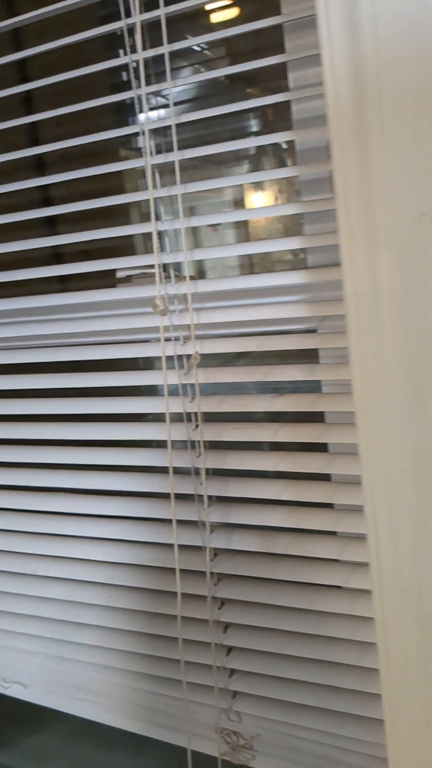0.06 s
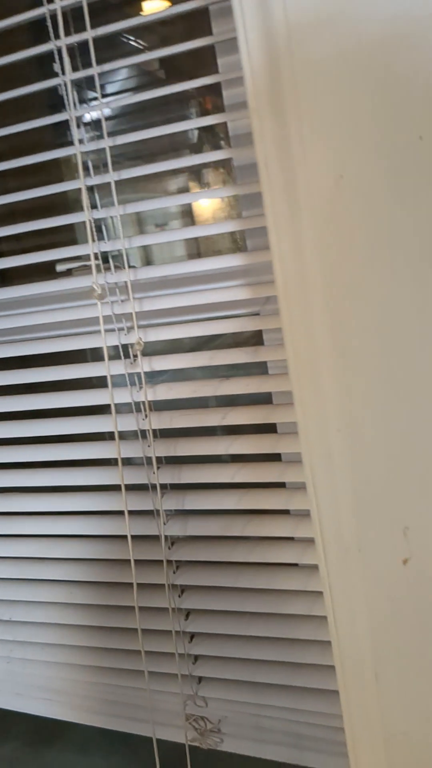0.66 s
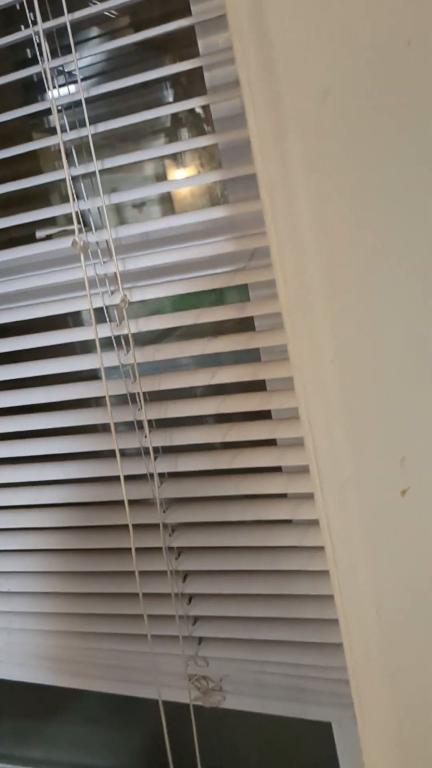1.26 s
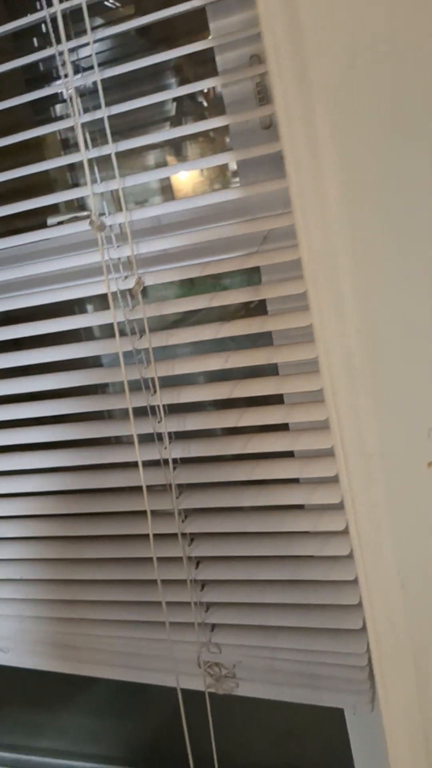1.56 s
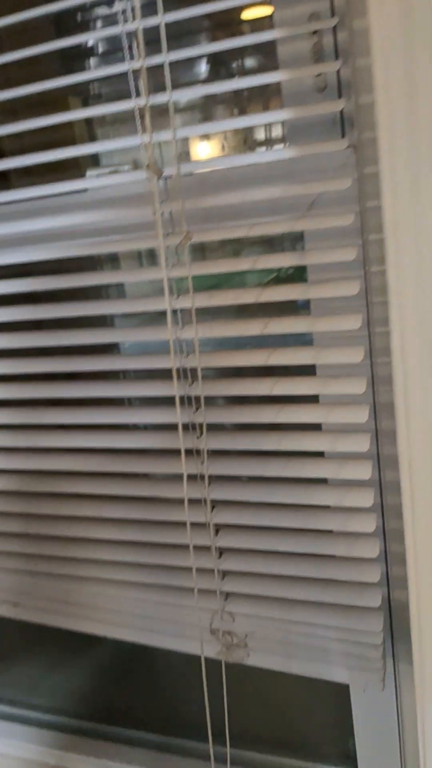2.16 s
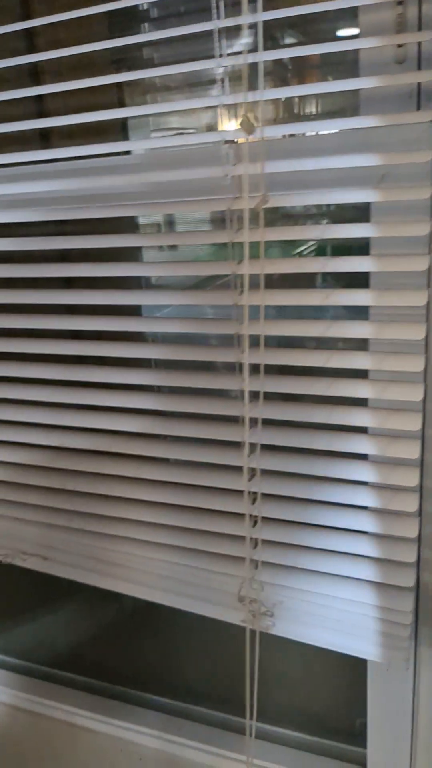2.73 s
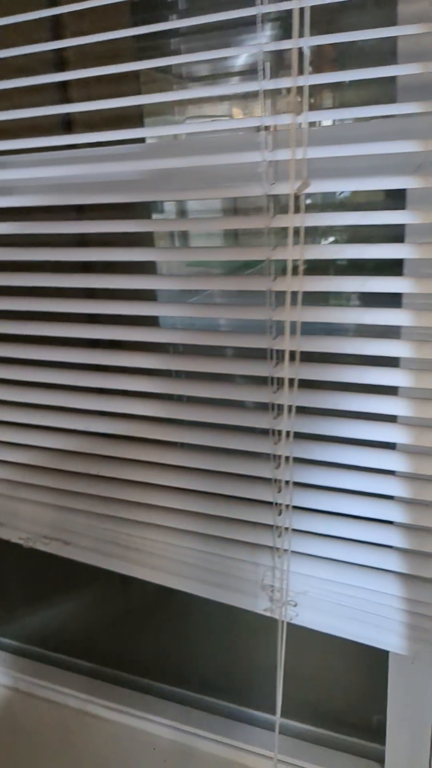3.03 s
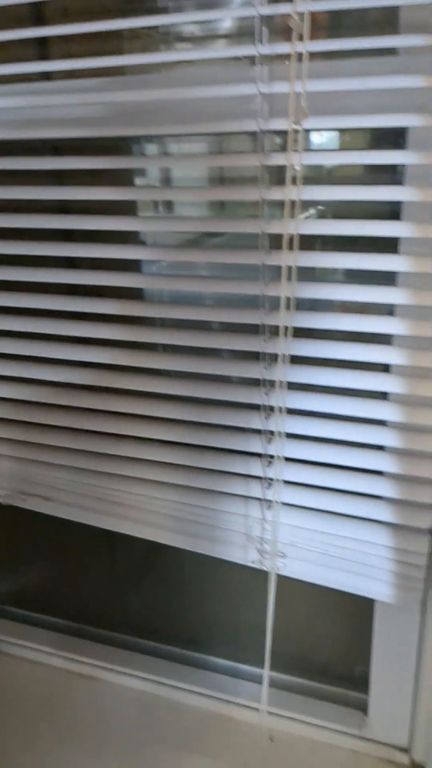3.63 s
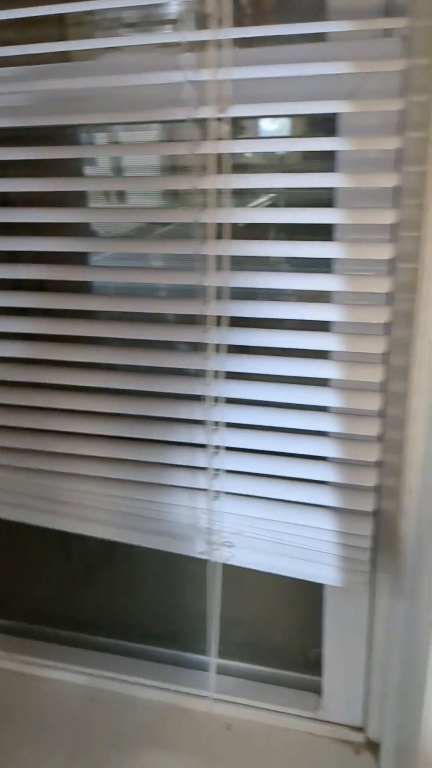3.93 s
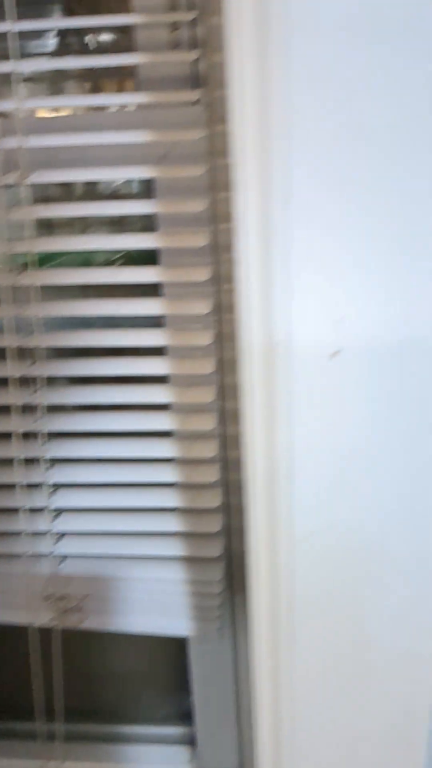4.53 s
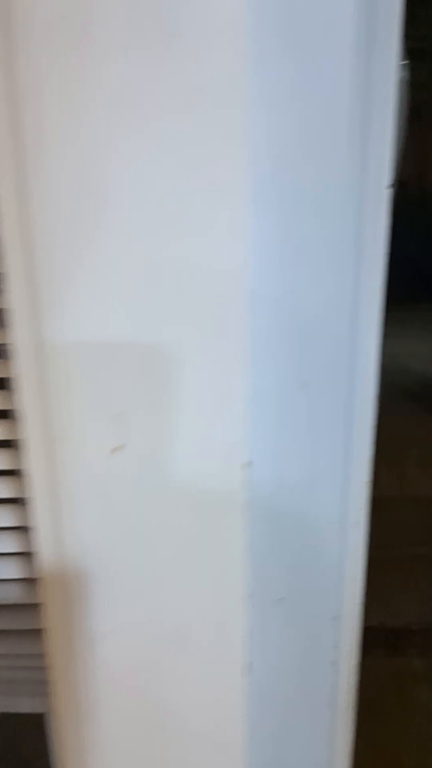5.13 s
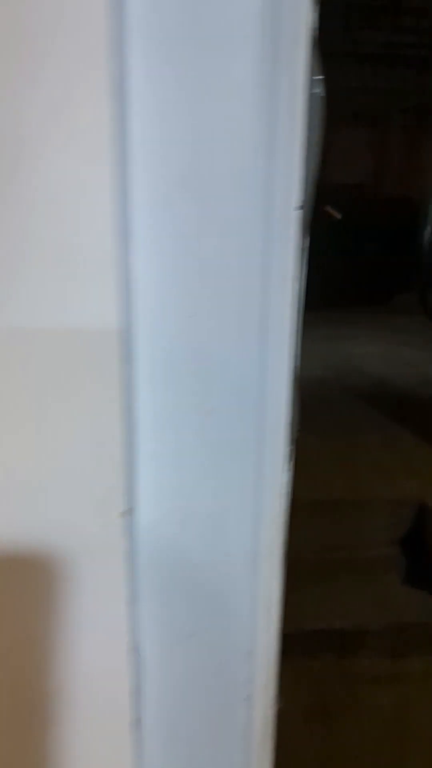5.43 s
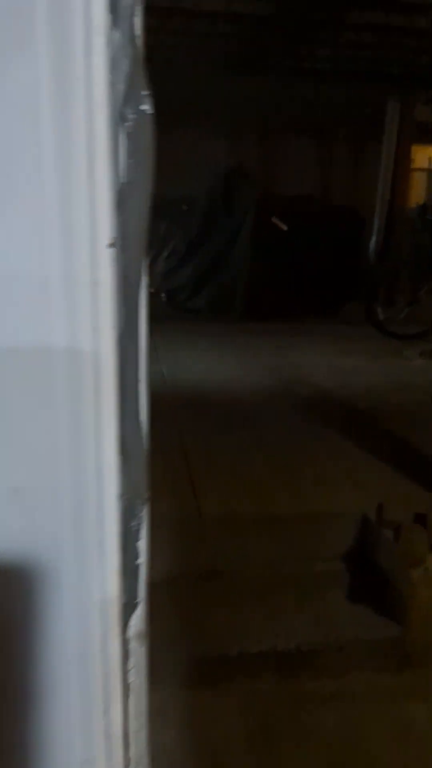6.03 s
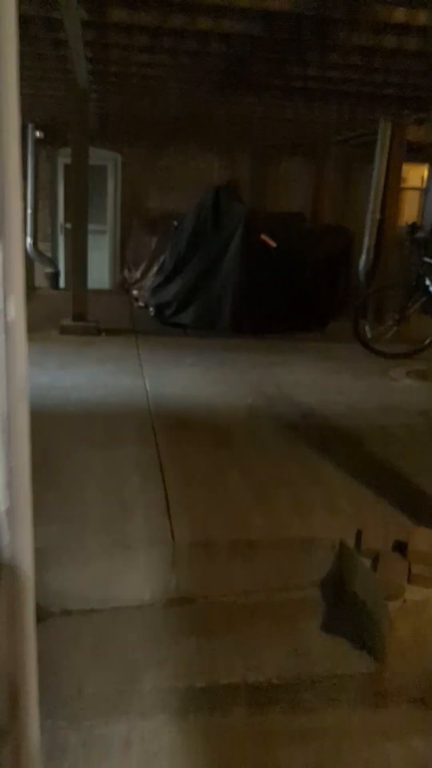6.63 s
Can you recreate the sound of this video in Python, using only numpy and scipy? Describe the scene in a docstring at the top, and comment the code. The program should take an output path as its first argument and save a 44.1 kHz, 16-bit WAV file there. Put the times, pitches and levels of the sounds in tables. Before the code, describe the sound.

A latch clicks, then a glass door jerks open with a boom, rattling blinds and a short squeal, followed by a sharp knock.

```python
"""Opening a patio door with blinds

In a hard, echoing room the handle and latch click. A glass door rubs out of its seal and jerks free:
the pane booms, the slats of the blinds slap the glass and a metal part squeals. A sharp knock follows,
then small ticks and a scrape along the rail as the door swings aside, all over a low rumble."""
import sys
import numpy as np
from scipy import signal
from scipy.fft import rfft, irfft, next_fast_len
from scipy.io import wavfile
from scipy.ndimage import uniform_filter1d, minimum_filter1d

SR = 44100
rng = np.random.default_rng(int(sys.argv[2]) if len(sys.argv) > 2 else 0)


def unload_audio(sound):
    """Save the sound as a 16-bit wav file, at the path given as the first command line argument."""
    columns = np.transpose(np.atleast_2d(sound))
    # keep every value between -1 and 1, then stretch to whole-number steps
    steps = np.round(np.clip(columns, -1, 1) * 32767)
    wavfile.write(sys.argv[1], SR, steps.astype(np.int16))


N = 298998

# Ways the glass vibrates: pitch_hz, width_hz, level_db, ring_s (time to fade by 60 dB)
PANE_MODES = [(22, 12.7, 6, 2.24), (42, 21, 2.5, 1.52), (76.9, 14, 2.5, 1.75), (95, 10, -1, 1.55),
              (117.7, 11.8, -1.5, 1.24), (193, 110, -18, 1.1)]
# Pushes that bend the glass: start_s, level_db, rise_s
PUSHES = [(0.19, -46, 0.062), (1.04, -41, 0.041), (1.55, -39, 0.22), (1.88, -37, 0.088),
          (2.662, -40, 0.072), (2.88, -36, 0.16), (3.1, -20, 0.16), (3.325, -7.5, 0.085), (4.55, -39, 0.19),
          (5.15, -46.5, 0.43), (6.12, -47, 0.038)]
def pane_boom(hold_s=0.0058, rest_db=-57.5, spread_hz=210):
    """Each push sets the big pane booming; the deepest notes are the most alike left and right."""
    t, out = np.arange(N) / SR, np.zeros((2, N))
    coarse = t[::64]
    total = np.sqrt(sum(width * amp(db) ** 2 for _, width, db, _ in PANE_MODES))
    for hz, width, mode_db, ring_s in PANE_MODES:
        power = amp(rest_db) ** 2  # the glass is never quite still
        for s, db, rise in PUSHES:
            fall_db = 60 * np.maximum(coarse - s - rise - hold_s, 0) / ring_s
            power += (np.clip((coarse - s) / rise, 0, 1) * amp(db - fall_db)) ** 2
        boom = filtered(noise(), lambda f: resonances([(hz, width, 0)])(f) / (1 + (f / (3 * hz)) ** 2))
        mid, side = boom / np.sqrt(np.abs(uniform_filter1d(boom ** 2, size=SR // 5, axis=1)) + 1e-12)
        side = side * hz / np.hypot(hz, spread_hz)
        level = np.interp(t, coarse, np.sqrt(power))
        out += amp(mode_db) * np.sqrt(width) / total * level * np.array([mid + side, mid - side])
    return out


# Ways the door panel vibrates: pitch_hz, width_hz, level_db
DOOR_MODES = [(118, 18, 0.5), (255, 87, -10), (369.4, 68, 3), (460, 104, 2), (569, 89, 3.5), (656, 160, 0),
              (730, 59, -12.5), (976, 48, -4), (1006, 6.5, -14.5)]
# Tone of a hit's crack and of its bright edge: pitch_hz, level_db
CRACK_TONE = [(200, -32), (700, 0.5), (1200, 2.5), (1450, 0.5), (1800, 3.5), (2500, -2), (3050, -3),
              (3500, -12.5), (6000, -19.5)]
EDGE_TONE = [(2500, -41.5), (3500, -4.5), (4100, 6), (4900, 1), (5800, -3.5), (7000, -1), (12000, -37)]
def contact(body_db, edge_db, pan_db, chatter_s=0.19, snap_s=0.028, rise_s=0.001):
    """One hit snaps and chatters on one side and shakes the whole door panel."""
    t = np.arange(SR // 4) / SR
    fade = amp(-60 * t / chatter_s) + amp(2 - 60 * t / snap_s)
    blow = noise(len(t)) * fade * (1 - np.exp(-t / rise_s))

    def layer(response, db):
        sound = filtered(blow, response)
        return sound / np.std(sound[:, :SR // 60]) * amp(db)
    crack = layer(colour(CRACK_TONE), -9) + layer(colour(EDGE_TONE), edge_db - 8)
    return crack * panned(pan_db) + layer(resonances(DOOR_MODES), body_db - 8)


# Knocks of handle, latch and frame: start_s, level_db, body_boost_db, edge_boost_db, pan_db
KNOCKS = [(0.2621, -42, 5, -11, 5), (0.455, -54.5, 2, -3, 2), (1.0955, -43.5, 4.5, -7, 11),
          (1.6696, -28, 0.5, -16, 6), (1.8609, -39, 9, -11, -5.5), (1.902, -41.5, -2.5, -8.5, 2.5),
          (2.0504, -25, -9, -31, 0.5), (2.0663, -20, -1.5, -33, 5), (2.0931, -28.5, 7, -31, -9),
          (2.8747, -41, -3, -11, -8.5), (3.016, -25.5, -15.5, -9, 6.5), (3.1325, -14.5, 0, -6, 5.5),
          (3.1843, -18.5, 6, -5.5, 7.5), (3.2275, -13, -6, -14.5, 1.5), (3.2345, -11, -7.5, -8, 6.5),
          (3.2442, -13, -4, -10, 8.5), (3.2577, -15, 1.5, -6.5, -0.5), (3.3444, -26, 0, -15, 5.5),
          (3.385, -16.5, 2.5, -10, 1), (3.44, -17, -1, -19.5, 2.5), (3.502, -17.5, -3.5, -12.5, 5),
          (3.53, -20, 1, -14.5, 4), (4.055, -45, -4, -21.5, -2), (4.255, -49, 7, -16, -7.5),
          (4.31, -50.5, 2, -23, -0.5), (4.41, -45, 1, -17, -6), (4.535, -54, 6.5, 0, 0),
          (4.7173, -13, -5, -12.5, 2), (4.7399, -24, 6, -12, 4), (5.0968, -36.5, 6, -13, 1),
          (5.2673, -45, 15.5, -8, -9), (5.8631, -47, 6, -11, -11.5)]
def knocks(hits=3, gap_s=0.022, loss_db=16, duller_db=7):
    """Hard parts hit and bounce, each bounce weaker and duller than the last."""
    out = np.zeros((2, N))
    for s, db, body_db, edge_db, pan_db in KNOCKS:
        knock = np.zeros((2, SR * 5 // 4))
        for k in range(hits):
            add(knock, k * gap_s, amp(-k * loss_db) * contact(body_db + k * duller_db, edge_db, pan_db))
        add(out, s, amp(db) * in_room(knock, wet_db=-6.5))
    return out


# Tone of the dull rub, the scratch and the hiss: pitch_hz, level_db
RUB_TONE = [(60, -15.5), (150, -11), (270, -6.5), (400, -3.5), (520, 1), (720, -5), (920, -5.5),
            (1200, -13.5), (2500, -52.5)]
SCRATCH_TONE = [(600, -39.5), (1200, 0), (1800, 8), (2300, -1.5), (3000, 2), (3500, -18), (6000, -35)]
HISS_TONE = [(2500, -29), (3500, -3), (4200, 1), (5000, 0), (5800, 0), (7000, -6), (12000, -20.5)]
# Where the seal rasps: pitch_hz, width_hz, level_db
SEAL_MODES = [(1654, 44, -3.5), (2180, 67, -2), (2398, 120, 2.5), (2633, 81, 1.5), (2872, 100, -2),
              (3160, 84, -2.5), (3727, 62, -11.5), (5030, 100, -15.5), (5600, 110, -18)]
# Rubbing strokes: peak_s, hold_s, rub_db, scratch_db, hiss_db, rasp_db, swell_db_per_s, fade_db_per_s
# (scratch, hiss and rasp are relative to the rub)
STROKES = [(0.0, 0.007, -52.5, -5, -15.5, -9, 99, 12.8), (1.119, 0.014, -62, -1, 5.5, 5, 31.3, 33),
           (1.678, 0.04, -38.5, -12, -16.5, -11, 103.6, 21), (2.099, 0.016, -44, -2.5, -11.5, -9, 410, 37),
           (3.002, 0.27, -30.5, -9.5, -11, -11.5, 81.6, 77), (3.253, 0.012, -18, -7.5, -13, -16, 135, 37.5),
           (4.688, 0.015, -38.5, -7.5, -11, -7.5, 104.6, 29), (5.28, 0.22, -50.5, -3, -12, -5.5, 200, 450),
           (5.73, 0.032, -55.5, -6, -10, -8.5, 147.7, 440), (6.189, 0.26, -62, -2.5, -4.5, 3, 503, 48)]
SCRATCH_FADE, HISS_FADE = 1.245, 1.84  # brighter sounds fade this many times faster
def rubbing():
    """The seal drags on the frame and the slats chafe, in small uneven slips."""
    rub_db, scratch_db, hiss_db, rasp_db = np.transpose(STROKES)[2:6]
    grain = slips(per_s=220, life_s=0.0013, rough_db=-3.5)
    rub = pressure(rub_db) * unit(filtered(grain, colour(RUB_TONE)))
    scratch = pressure(rub_db + scratch_db, SCRATCH_FADE) * unit(filtered(grain, colour(SCRATCH_TONE)))
    hiss = pressure(rub_db + hiss_db, HISS_FADE) * unit(filtered(grain, colour(HISS_TONE)))
    coarse_grain = slips(per_s=61, life_s=0.0033, rough_db=7)
    rasp = pressure(rub_db + rasp_db, SCRATCH_FADE) * unit(filtered(coarse_grain, resonances(SEAL_MODES)))
    # the seal lets go on the left; the open door then passes on the right
    pan_db = over_time([(2.6, 0), (3.0, 5.5), (3.35, 4), (3.7, 4),
                        (4.6, -1.5), (5.2, -0.5), (5.8, -8), (6.2, 0)])
    edge = (scratch + hiss + rasp) * amp(np.array([pan_db, -pan_db]) / 2)
    return in_room(rub + edge, wet_db=-11.5)


def slips(per_s, life_s, rough_db):
    """Noise that flares at each of many small random slips."""
    kicks = (rng.random(N) < per_s / SR) * amp(rough_db * np.clip(rng.standard_normal(N), -2, 1))
    flare = signal.lfilter([1], [1, -np.exp(-1 / (life_s * SR))], kicks)
    return noise() * (1 + flare)


def pressure(levels_db, faster=1):
    """How hard the door rubs: each stroke swells, holds and fades."""
    t, power = np.arange(N) / SR, 0
    for db, (s, hold, *_, swell, fade) in zip(levels_db, STROKES):
        power += amp(db - swell * np.maximum(s - t, 0) - faster * fade * np.maximum(t - s - hold, 0)) ** 2
    return np.sqrt(power)


# Notes of each part that rings: pitch_hz, level_db, ring_s
HANDLE = [(191.5, -6, 0.71), (258, -1.5, 0.68), (342, 0, 0.39), (458.6, 4, 0.27), (634, 6.5, 0.23),
          (2450, 7, 0.15), (2450, -6.5, 0.95), (2910, -9, 0.48)]
LATCH = [(373, -20, 1), (493, -7, 0.45), (658, -13, 0.35), (715, -4.5, 0.85), (763, -9.5, 0.6),
         (1052, -11, 0.18), (1760, 1.5, 0.12)]
FRAME = [(488, 2, 0.58), (549, 0.5, 0.98), (630, -0.5, 1.4), (704, -8.5, 1.8), (904, -4.5, 1.3),
         (1050, -10, 0.65), (1580, -5, 1), (1760, 7, 0.19), (1970, 5, 0.15), (2060, 3.5, 0.13),
         (2190, -1, 0.15)]
SILL = [(442, -0.32, 0.39), (498, 0.4, 0.32), (590, 0, 0.15), (654, -1.7, 0.28)]
GLASS = [(84.4, -4.5, 0.5), (107.2, 3, 0.4), (121.4, -2, 0.7)]
HINGE = [(390, 3.5, 0.36), (723, -7, 0.8)]
STOP = [(349, -2.5, 0.27), (397.7, -3.5, 0.18), (473, -6.5, 0.054), (554, -2.5, 0.23), (805, 1.5, 0.077),
        (1260, 4.5, 0.046), (1740, -12, 0.083)]
BEAD = [(2020, -5, 0.059), (2270, -1.5, 0.044), (2690, 1, 0.032)]  # a small hard piece on the cord
CATCH = [(708, -3, 0.15), (810, -1, 0.13), (945, -1, 0.42), (1090, -4, 0.16), (1500, -4, 0.09),
         (1776, -3, 0.11), (3040, -9, 0.26), (4560, -12, 0.11)]
# Jolts to those parts: start_s, notes, level_db, swell_s, waver_rad
JOLTS = [(1.088, HANDLE, -44.5, 0.0037, 2.2), (1.667, HANDLE, -40.5, 0.0014, 1.9),
         (2.075, LATCH, -24.5, 0.013, 1.65), (3.246, FRAME, -21, 0.0013, 0.89),
         (1.69, SILL, -43.5, 0.0051, 0.79), (1.768, SILL, -36.5, 0.0031, 1.15),
         (1.8, SILL, -45, 0.0024, 0.82), (2.691, SILL, -48, 0.0013, 1.55), (3.495, GLASS, -8, 0.025, 0.3),
         (4.555, HINGE, -47, 0.0038, 0.71), (4.623, HINGE, -29.5, 0.02, 0.75),
         (4.718, STOP, -20, 0.00032, 1.13), (4.743, STOP, -22, 0.0064, 1.07),
         (5.096, BEAD, -42, 0.00078, 2.6), (5.136, BEAD, -35.5, 0.0015, 2.5),
         (5.862, CATCH, -47, 0.001, 2.2)]
def ringing_parts(waver_hz=30):
    """Panels, glass and small metal parts ring after a jolt; loose ones buzz and waver."""
    out, t = np.zeros((2, N)), np.arange(SR) / SR
    for s, notes, jolt_db, swell, waver in JOLTS:
        for hz, db, ring_s in notes:
            drift = wobble(noise(SR), waver_hz)
            phase = 2 * np.pi * (hz * t + rng.random((2, 1)) / 4) + waver * drift
            flutter_db = 3 * min(waver, 1) * drift[::-1]
            level = amp(jolt_db + db + flutter_db - 60 * t / ring_s) * (1 - np.exp(-t / swell))
            add(out, s, np.sin(phase) * level)
    return out


# Notes of a slat: base_pitch_hz, level_db, ring_s
SLAT_NOTES = [(2790, -6, 0.018), (3340, -6.5, 0.014), (3830, -6.5, 0.0071), (4140, -5.5, 0.028),
              (4413, -11, 0.022)]
# Tone of its snap: pitch_hz, level_db
SNAP_TONE = [(300, -18.5), (1500, 1), (3000, 1), (5500, -4), (8000, -10.5)]
# Slaps on the glass: start_s, level_db, pitch_ratio
CLACKS = [(1.671, -34.5, 0.76), (1.694, -38, 0.78), (1.745, -43.5, 0.78), (1.903, -41, 0.59),
          (2.135, -39.5, 0.47), (2.267, -43.5, 0.59), (3.025, -29, 1.1), (3.094, -28, 1.05),
          (3.131, -21, 1.2), (3.14, -24, 1.2), (3.189, -25, 1.4), (3.194, -22.5, 1.25), (3.242, -15, 0.76),
          (3.257, -10.5, 1), (3.27, -17.5, 0.95), (3.3455, -18.5, 0.85), (3.384, -21.5, 1.4),
          (3.402, -30.5, 1.4), (3.559, -31.5, 1.7)]
def slat_clacks(snap_s=0.012):
    """A slat slaps the glass: a dry snap and a brief ring at its own pitch."""
    out, t = np.zeros((2, N)), np.arange(SR // 12) / SR
    for s, db, ratio in CLACKS:
        ring = 0
        for hz, note_db, ring_s in SLAT_NOTES:
            phase = 2 * np.pi * (ratio * hz * t + rng.random((2, 1)) / 3)
            ring += amp(note_db - 60 * t / ring_s) * np.sin(phase)
        snap = unit(filtered(noise(len(t)), colour(SNAP_TONE))) * amp(-60 * t / snap_s)
        add(out, s, amp(db) * (ring + snap) * panned(5))
    return in_room(out, wet_db=-10.5)


# Thin bright clicks at the height of the clatter: start_s, level_db
CLICKS = [(1.693, -41), (1.725, -44), (1.768, -44.5), (1.875, -42), (3.068, -27.5), (3.1317, -13),
          (3.154, -21), (3.175, -25.5), (3.197, -27), (3.302, -21), (3.323, -23.5), (3.347, -15),
          (3.388, -21), (3.409, -17.5), (4.728, -26), (4.798, -36), (4.838, -44), (4.966, -50),
          (5.138, -49)]
def bright_clicks(fade_s=0.0056):
    """Very short, bright clicks sound on the left."""
    out, t = np.zeros((2, N)), np.arange(SR // 30) / SR
    for s, db in CLICKS:
        add(out, s, amp(db - 60 * t / fade_s) * noise(len(t)) * panned(23))
    bright = colour([(1500, -23.5), (4000, -27.5), (6000, 6.5), (9000, 13.0), (15000, 3.0)])
    return in_room(filtered(out, bright), wet_db=-36)


def blind_taps(per_s=15, scatter_db=4, fade_s=0.012, rest_db=-61.5):
    """The swinging blinds keep tapping the door, harder the more it rubs."""
    timing, size = rng.uniform(-1.1, 1, (int(per_s * N / SR), 2)).T
    starts = (np.arange(len(timing)) + (1 + timing) / 2) * SR / per_s
    kicks = np.zeros(N)
    kicks[starts.astype(int)] = amp(scatter_db * size)
    fade = signal.lfilter([1], [1, -amp(-60 / (fade_s * SR))], kicks)
    blow = noise()
    crack = unit(filtered(blow, colour(CRACK_TONE))) + amp(-8) * unit(filtered(blow, colour(EDGE_TONE)))
    tap = crack * panned(2) + amp(-2) * unit(filtered(blow, resonances(DOOR_MODES)))
    shaking = amp(-7) * pressure(np.transpose(STROKES)[2], SCRATCH_FADE) + amp(rest_db)
    return in_room(tap * fade * shaking, wet_db=-3)


def slat_crackle(per_s=70, middle_hz=3600, scatter_db=4, ring_s=0.0085):
    """Slat edges tick together, each at its own pitch, while the door moves."""
    count = int(per_s * N / SR)
    ticks = rng.standard_normal((count, 3))
    out, t = np.zeros((2, N)), np.arange(SR // 40) / SR
    for s, (size, pitch, side) in zip(rng.random(count) * N / SR, ticks):
        hz = middle_hz * np.exp(0.3 * pitch)
        level = amp(scatter_db * np.clip(size, -2, 2) - 60 * t / ring_s)
        add(out, s, panned(3 + 4 * side) * level * np.sin(2 * np.pi * hz * t))
    rub_db, _, hiss_db = np.transpose(STROKES)[2:5]
    return in_room(unit(out) * pressure(rub_db + hiss_db - 8.5, HISS_FADE), wet_db=4.5)


# Notes of the squeal: pitch_hz, level_db, fade_speed_ratio
SQUEAL_NOTES = [(2877, -17, 1.6), (2917, -3, 0.95), (3760, -27.5, 1.6), (5660, -15.5, 2.1)]
def metal_squeal(start_s=3.475, drag_s=0.2, level_db=-26, flutter_db=2.5, rise_s=0.06):
    """A metal part sings as it drags, then rings out; higher notes are rougher."""
    out, t = np.zeros((2, N)), np.arange(SR) / SR
    fall_db = 36 * t + 60 * np.maximum(t - drag_s, 0) / 0.72  # fades faster once free
    main_hz = SQUEAL_NOTES[1][0]
    for hz, db, faster in SQUEAL_NOTES:
        drift = wobble(noise(SR), 20) * (hz / main_hz) ** 2
        level = amp(level_db + db - faster * fall_db + flutter_db * np.tanh(drift[::-1]))
        tone = np.sin(2 * np.pi * hz * t + 0.35 * drift)
        add(out, start_s, tone * level * np.clip(t / rise_s, 0, 1))
    return in_room(out, wet_db=-6)


# Ways the rail vibrates as the scrape begins: pitch_hz, width_hz, level_db
RAIL_MODES = [(3200, 85, 1.5), (4570, 590, -6), (5550, 900, -5.5)]
# Strength of the scrape: time_s, level_db
RAIL_LEVEL = [(5.0, -86), (5.11, -56.5), (5.24, -62), (5.29, -50.5), (5.55, -62.5), (5.76, -65),
              (5.85, -100)]
def rail_scrape(sag_per_s=0.052, rough_db=2, skip_db=3):
    """The door's edge scrapes the rail, juddering, skipping and sinking in pitch as it slows."""
    out, t = np.zeros((2, N)), np.arange(N) / SR
    slowing_time = np.cumsum(1 - sag_per_s * (t - RAIL_LEVEL[1][0])) / SR
    for hz, width, db in RAIL_MODES:
        out += amp(db) * np.sin(2 * np.pi * hz * slowing_time + 1.4 * wobble(noise(), width / 2))
    judder = wobble(noise(), 120)
    grip = np.tanh(wobble(rng.standard_normal(N), 18))
    level = amp(over_time(RAIL_LEVEL) + rough_db * judder + skip_db * (grip - 1))
    return out * level * (t > RAIL_LEVEL[0][0])


# How long the room echoes: pitch_hz, ring_s
ROOM_ECHO = [(100, 1.7), (500, 1.32), (1000, 1.05), (2000, 0.5), (4000, 0.35), (8000, 0.42)]
def in_room(x, wet_db):
    """Hard walls add a wash of echo in which the treble dies first."""
    hz, t, spectrum = signal.stft(noise(SR * 3 // 2), SR, nperseg=256)
    fade = amp(-60 * t / over_pitch(ROOM_ECHO, hz)[:, None])
    tail = signal.istft(spectrum * fade, SR, nperseg=256)[1]
    echo = signal.fftconvolve(x, tail / np.linalg.norm(tail[0]), axes=1)[:, :x.shape[1]]
    return x + amp(wet_db) * echo


# Tone of the background: pitch_hz, level_db
RUMBLE_TONE = [(20, -23), (60, -13), (85, 7.5), (130, -8), (250, -7), (500, -9.5), (800, -16),
               (1400, -21.5), (3000, -25.5), (3600, -33.5), (6000, -33.5), (12000, -40.5)]
# Its strength, which dips as the doorway is reached: time_s, level_db
RUMBLE_LEVEL = [(0, -53), (4.4, -49.5), (5.5, -51.5), (5.85, -56.5), (6.78, -53.5)]
def rumble():
    """The building and the night outside give a low rumble."""
    return amp(over_time(RUMBLE_LEVEL)) * unit(filtered(noise(), colour(RUMBLE_TONE)))


def amp(db):
    """Turn decibels into a gain."""
    return 10 ** (np.asarray(db) / 20)


def unit(x):
    """Scale to an average power of 1."""
    return x / np.sqrt(np.mean(x ** 2) + 1e-20)


def noise(size=N):
    """Unrelated white noise for left and right."""
    return rng.standard_normal((2, size))


def wobble(white, hz):
    """Smooth white noise into a random wobble, mostly slower than hz."""
    return unit(filtered(white, lambda f: np.exp(-(f / hz) ** 2)))


def over_pitch(points, hz):
    """Join (pitch_hz, value) points on a log scale."""
    pitches, values = np.transpose(points)
    return np.interp(np.log(hz + 1), np.log(pitches + 1), values)


def over_time(points):
    """Join (time_s, value) points, one value a sample."""
    return np.interp(np.arange(N) / SR, *np.transpose(points))


def filtered(x, response):
    """Multiply each frequency in x by response(hz)."""
    n = x.shape[-1]
    padded = 2 * next_fast_len(n // 2 + 4096)
    return irfft(rfft(x, padded) * response(np.fft.rfftfreq(padded, 1 / SR)), padded)[..., :n]


def colour(points):
    """A filter through (pitch_hz, level_db) points that never rings ahead of the sound."""
    def response(hz):
        cepstrum = irfft(np.log(amp(over_pitch(points, hz))))
        cepstrum[1:len(hz) - 1] *= 2
        cepstrum[len(hz):] = 0
        return np.exp(rfft(cepstrum))
    return response


def resonances(modes):
    """A filter that rings at each (pitch_hz, width_hz, level_db)."""
    return lambda f: sum((-1) ** k * amp(db) * 1j * f * width / (hz * hz - f * f + 1j * f * width)
                         for k, (hz, width, db) in enumerate(modes))


def panned(db):
    """Gains that make the left db louder than the right."""
    return amp(np.array([[db], [-db]]) / 2)


def add(track, s, sound):
    """Mix a sound in at s seconds."""
    part = track[:, max(round(s * SR), 0):][:, :sound.shape[1]]
    part += sound[:, :part.shape[1]]


# How alike left and right are: pitch_hz, likeness (1 same, 0 unrelated, -1 opposite)
LIKENESS = [(40, 1), (100, 1), (180, -0.083), (300, -0.41), (600, 0.11), (2000, -0.017), (6000, -0.12)]
def scene():
    """Mix all sources; the noisy ones are blended so both sides share the deep bass."""
    ringing = pane_boom() + ringing_parts() + metal_squeal() + rail_scrape() + slat_clacks()
    noisy = rubbing() + bright_clicks() + rumble() + knocks() + blind_taps() + slat_crackle()
    blend = lambda hz: np.arcsin(np.clip(over_pitch(LIKENESS, hz), -1, 1)) / 2
    own = filtered(noisy, lambda hz: np.cos(blend(hz)))
    crossed = filtered(noisy[::-1], lambda hz: np.sin(blend(hz)))
    return own + crossed + ringing


# How much louder the left microphone is: pitch_hz, difference_db
MIC_BALANCE = [(40, 2), (110, -2), (290, 2.5), (500, -4), (850, -5), (1400, -2.5), (2400, 2), (4500, 1)]
# Treble loss of both microphones: pitch_hz, gain_db
MIC_TONE = [(5800, 0.5), (6200, -13), (6500, -19.5), (7000, -25.5), (8500, -39.5), (10000, -43.5),
            (15000, -34.5)]
def record(dry, ceiling=0.95, top_hz=15800):
    """Two microphones differ in tone and dull the treble; the highest peaks are turned down."""
    tilted = filtered(dry, lambda hz: amp(np.array([[1], [-1]]) * over_pitch(MIC_BALANCE, hz) / 2))
    dull = filtered(tilted, colour(MIC_TONE))
    needed = np.minimum(1, ceiling / (np.abs(dull).max(axis=0) + 1e-9))
    gain = uniform_filter1d(minimum_filter1d(needed, size=201), size=101)
    return filtered(dull * gain, lambda hz: hz < top_hz)


dry = scene()
out = record(dry)
unload_audio(out)
```